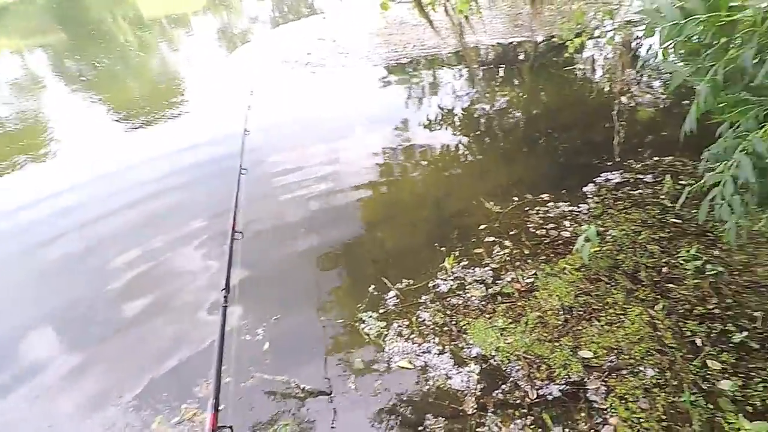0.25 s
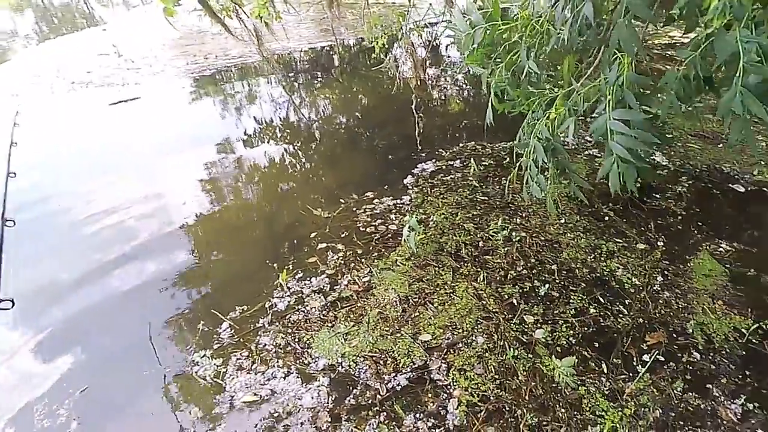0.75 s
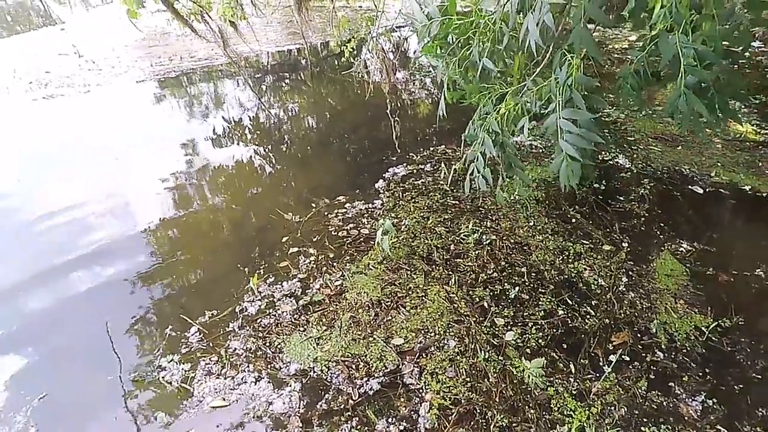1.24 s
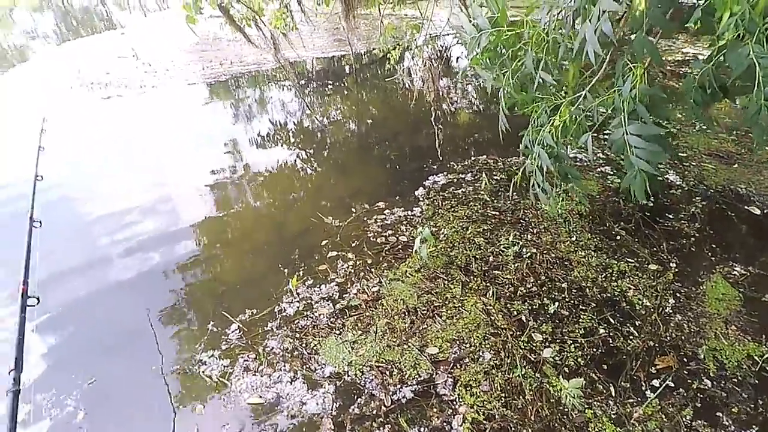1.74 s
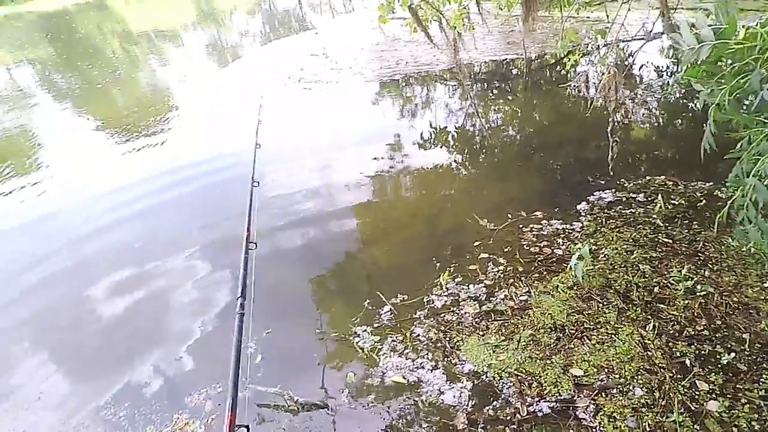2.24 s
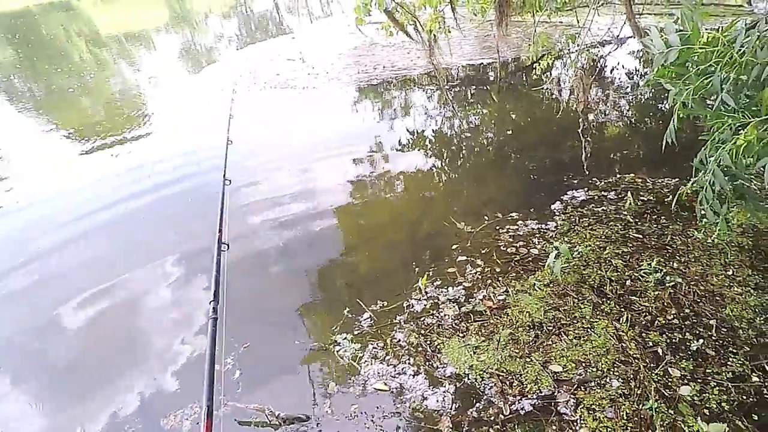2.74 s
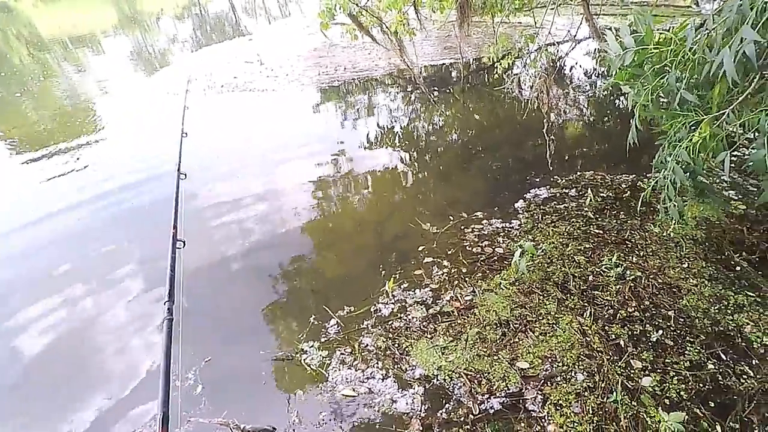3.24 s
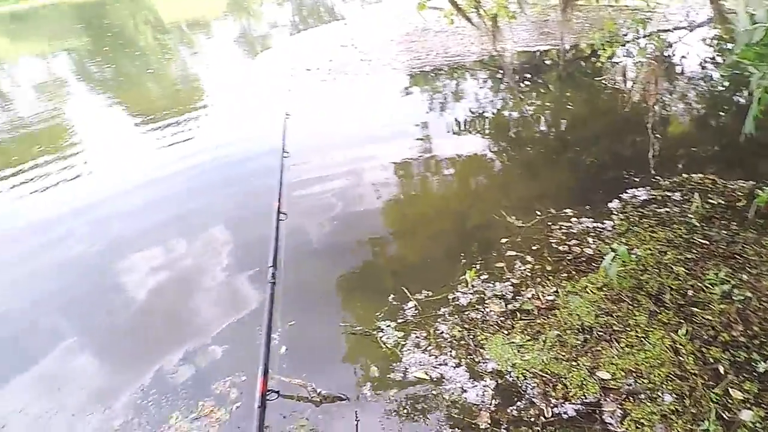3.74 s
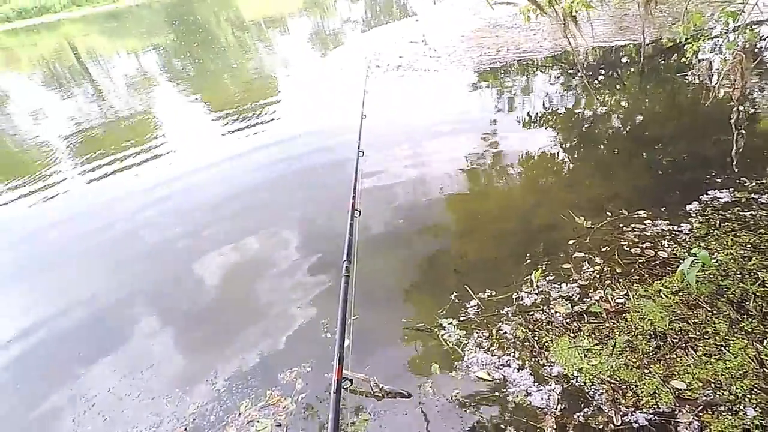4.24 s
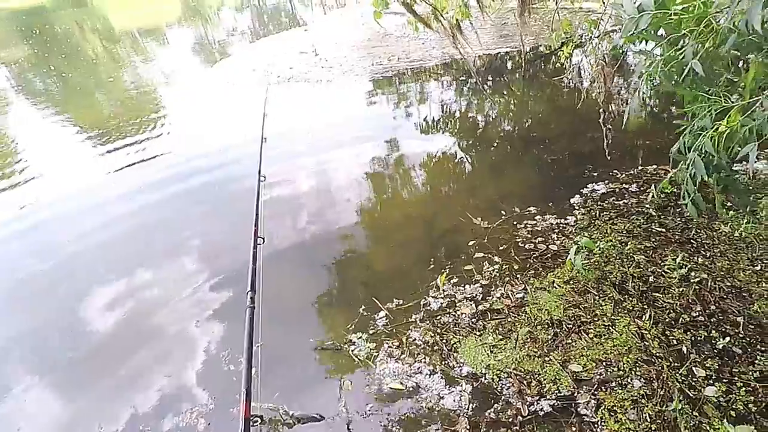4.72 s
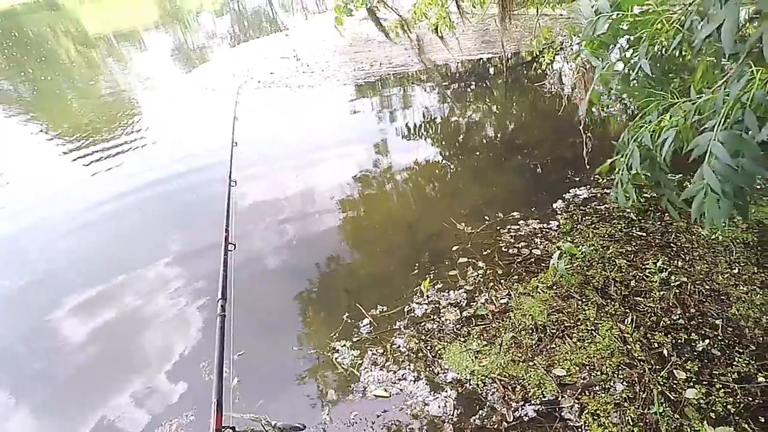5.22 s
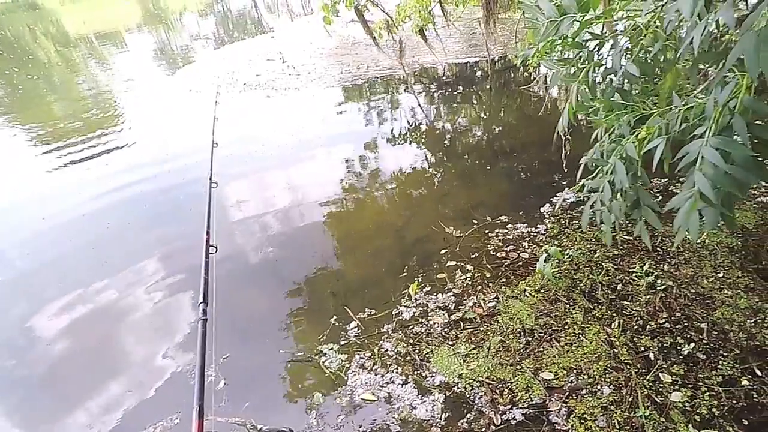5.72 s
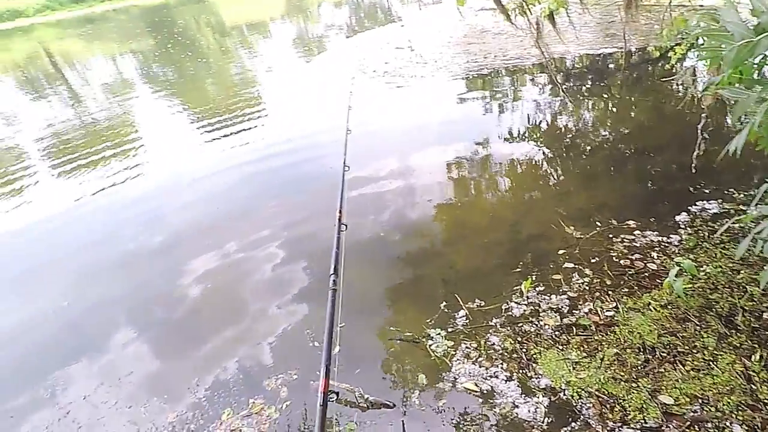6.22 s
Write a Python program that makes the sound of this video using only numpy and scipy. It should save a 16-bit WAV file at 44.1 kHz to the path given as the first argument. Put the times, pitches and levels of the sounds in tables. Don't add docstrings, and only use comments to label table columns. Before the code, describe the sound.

Three loud hollow plops at a pond's edge, water spattering between them, before gusts fade and a blackbird whistles among distant birds.

```python
import sys
import numpy as np
from scipy import signal
from scipy.fft import rfft, irfft
from scipy.io import wavfile
from scipy.ndimage import uniform_filter1d

SR = 44100
rng = np.random.default_rng(int(sys.argv[2]) if len(sys.argv) > 2 else 0)


def digitize_waveform(pressure):
    field = np.atleast_2d(pressure).T
    bounded = np.clip(field, -1, 1)
    quanta = np.round(bounded * 32767).astype(np.int16)
    wavfile.write(sys.argv[1], SR, quanta)


def gain_from_decibels(decibels):
    exponent = np.asarray(decibels, float) / 20
    return 10 ** exponent


N = 285318
T = np.arange(N) / SR


def unit(x):
    return x / np.sqrt(np.mean(x ** 2))


def coloured(points):
    hz, db = np.transpose(points)
    f = np.maximum(np.fft.rfftfreq(N, 1 / SR), 1)
    gain = gain_from_decibels(np.interp(np.log(f), np.log(hz), db))
    return unit(irfft(rfft(rng.standard_normal(N)) * gain, N))


def band(lo_hz, hi_hz):
    sos = signal.butter(3, [lo_hz, hi_hz], "bandpass", fs=SR, output="sos")
    return unit(signal.sosfilt(sos, rng.standard_normal(N)))


def flicker(rate_hz):
    hold = int(SR / rate_hz)
    return uniform_filter1d(np.repeat(rng.standard_normal(N // hold + 1), hold), hold)[:N]


def add(out, start_s, x):
    i = int(start_s * SR)
    out[i:i + len(x)] += x[:N - i]


def phase(hz):
    return 2 * np.pi * np.cumsum(hz) / SR


def edges(t, length_s, edge_s):
    return np.clip(np.minimum(t, length_s - t) / edge_s, 0, 1)


def ping(hz, t60, glide, rise):
    t = np.arange(int(t60 * SR)) / SR
    tone = np.sin(2 * np.pi * hz * (t + glide * t ** 2 / t60))
    return tone * gain_from_decibels(-60 * t / t60) * np.minimum(t / rise, 1)


# opening_s, deepest_hz, glide_per_s, last_db, fade_db_per_s, skew_rad
CAVITIES = [
    (.1729, 105.1, -27.3, -2.9, 655, .4),
    (.8791, 87.8, -66.8, -1.3, 1040, -1.03),
    (1.5937, 73, -14.6, -1.1, 567, .51),
]
# pinch_s, first_hz, last_hz, climb_s
BUBBLES = [
    (.1908, 51.9, 405.5, .0107),
    (.8965, 160.4, 522.9, .0458),
    (1.6169, 150.4, 401.7, .0155),
]
# peak_db, early_drop_db, t60_s, life_s
RINGS = [
    (4.1, 14.6, .23, .0373),
    (3.7, .4, .14, .0481),
    (7.4, 8.2, .108, .0435),
]
# late_rush_share, rush_s, settling_s
NECKS = [
    (.26, .0005, .0135),
    (.56, .0008, .0084),
    (.63, .0035, .0117),
]
# share, lag_s
BANK = [
    (.178, .0068),
    (.126, .0071),
    (.083, .0068),
]


def plops(opening_s=.004, closing_s=.0014, burst_s=.006):
    out = np.zeros(N)
    for cavity, bubble, ring, neck, bank in zip(CAVITIES, BUBBLES, RINGS, NECKS, BANK):
        opens, deep_hz, glide, last_db, fade, skew = cavity
        pinch, first_hz, top_hz, climb = bubble
        peak_db, drop_db, t60, life = ring
        rush, rush_s, settle_s = neck
        share, lag = bank
        back = np.arange(int((pinch - opens) * SR), 0, -1) / SR
        turn = 2 * np.pi * deep_hz * (back + glide * back ** 2 / 2)
        swell = np.minimum((back[0] - back) / opening_s, 1)
        throb = (1 - rush) * gain_from_decibels(fade * back) * np.cos(turn + skew * np.sin(turn))
        throb += rush * np.exp(-back / rush_s)
        t = T[:int(life * SR)]
        hz = top_hz - (top_hz - first_hz) * np.exp(-t / climb)
        db = last_db + (peak_db - last_db) * np.minimum(t / closing_s, 1)
        db = db - drop_db * (1 - np.exp(-(t / settle_s) ** 2)) - 60 * t / t60
        rings = gain_from_decibels(db) * np.minimum((life - t) / burst_s, 1) * np.cos(phase(hz))
        plop = np.concatenate([gain_from_decibels(last_db) * swell * throb, rings])
        add(out, pinch - back[0], plop)
        add(out, pinch - back[0] + lag, share * plop)
    return gain_from_decibels(2.1) * out


# pitch_hz, level_db (per Hz)
SLAP = [(240, -4.5), (400, -3.5), (867, -9.5), (2650, -12), (3840, -13.5), (6860, -15), (8570, -19.5),
        (10100, -37), (14000, -40)]
# start_s, end_s, first_db, last_db
TEARS = [
    (0.1674, 0.1745, -19, -15),
    (0.174, .178, -22, -27),
    (.18, 0.183, -27, -24),
    (0.184, 0.193, -23, -24),
    (0.873, 0.878, -39, -30),
    (0.881, 0.8883, -25.5, -11.5),
    (0.889, 0.903, -23, -26),
    (1.584, 1.596, -29, -18.5),
    (1.595, 1.601, -14.5, -31),
    (1.599, 1.623, -29, -28),
]
# pitch_hz, level_db, t60_s
WOOD = [(625, 8, 0.015), (1290, -0.5, 0.052), (2600, 1, 0.016), (3470, -5, 0.013), (4540, -13.5, 0.06),
        (7400, -20, 0.01432)]
# start_s, knock_db, lowest_mode_db, ring_share, upper_pitch_share
KNOCKS = [
    (0.1706, -14.5, 0, .3, 1.001),
    (0.8841, -12.5, -6, 0.46, .82),
    (1.5932, -8, -7, 0.78, 1.001),
]


def slaps(edge_s=0.00017):
    out, hiss = np.zeros(N), coloured(SLAP) * gain_from_decibels(2.5 * flicker(900))
    for start, end, first_db, last_db in TEARS:
        t = T[:int((end - start) * SR)]
        level = edges(t, t[-1], edge_s) * gain_from_decibels(np.linspace(first_db, last_db, len(t)))
        add(out, start, level * hiss[int(start * SR):][:len(t)])
    for start, knock_db, low_db, ring, upper in KNOCKS:
        for hz, db, t60 in WOOD:
            if hz < 1000:
                db += low_db
            elif hz < 2000:
                t60 *= ring
            else:
                hz *= upper
            add(out, start, gain_from_decibels(knock_db + db) * ping(hz, t60, glide=0, rise=0.00071))
    return out


# start_s, peak_db, pitch_hz
TICKS = [(0.0388, -29, 5180), (0.126, -28, 6670), (.2836, -27, 5710), (.355, -30, 3300), (.362, -29, 7400),
         (0.4135, -28, 7000), (.43, -29, 7200), (0.4604, -25, 5610), (0.4845, -23, 4800),
         (0.6085, -20, 6457), (.6683, -31, 4750), (0.7505, -16, 6700), (.8334, -28, 6130),
         (0.847, -22, 5500), (.962, -26, 4300), (1.036, -27, 5600), (1.0893, -31, 5550),
         (1.1146, -26, 3950), (1.121, -25, 3750), (1.166, -30, 7800), (1.172, -26, 4343),
         (1.206, -28, 6020), (1.2245, -26, 4500), (1.255, -30, 6500), (1.3135, -20, 5800),
         (1.329, -26, 8000), (1.435, -31, 7500), (1.475, -18, 5940), (1.478, -21, 3050),
         (1.5639, -25, 3660), (1.74, -29, 4000), (1.782, -26, 4489), (1.822, -30, 6900), (1.831, -27, 3900),
         (1.897, -31, 4100), (1.9928, -32, 4760), (2.1939, -26, 6640)]
# start_s, peak_db, pitch_hz,
# t60_s
DRIPS = [(.138, -33, 2600, .015), (0.219, -25, 1200, 0.03), (.244, -24, 1302, .015),
         (0.353, -32, 1070, 0.047), (.37, -36, 755, .06), (.384, -26, 1730, 0.02593),
         (.4, -42, 1012, 0.0459), (.484, -36, 948.6, .03), (.548, -34, 2470, 0.033), (.308, -31, 1370, .03),
         (.358, -35, 1500, .03), (.394, -33, 2700, .015), (0.873, -9, 85, .03), (.944, -24, 417, .04),
         (.952, -19, 430, 0.048), (0.951, -33, 1130, 0.03), (.985, -33, 1190, 0.059),
         (1.026, -24, 950, .015), (1.043, -29, 870, 0.037), (1.091, -24, 750, 0.023),
         (1.092, -27, 1530, 0.042), (1.123, -31, 2550, .015), (1.14, -31, 1155, 0.044),
         (1.16, -29, 1820, 0.044), (1.475, -21, 2210, 0.014), (1.57, -40, 1340, .1), (1.579, -35, 1340, .1),
         (1.5865, -9.5, 330, .012), (1.59, -24, 1200, .02), (1.659, -24, 440, .04), (1.662, -28, 1030, .03),
         (1.662, -30, 1710, .02), (1.74, -25, 347, .04), (1.765, -35, 1050, .04), (1.79, -35, 1600, .02),
         (1.801, -32, 1600, .02), (1.813, -33, 1600, .02), (1.883, -34, 1850, 0.033),
         (1.91, -30, 1750, .02), (1.96, -38, 840, .025), (1.981, -32, 2000, .012), (1.783, -28.5, 490, 0.1),
         (1.825, -32, 2600, .015), (1.847, -23, 1440, 0.025), (1.851, -29, 756, 0.066),
         (1.902, -32, 2090, 0.018), (1.906, -30, 2900, 0.013), (1.917, -31, 1400, 0.0216),
         (2.037, -32, 2600, 0.01366)]


def runoff():
    fizz = band(3900, 7160) + gain_from_decibels(-21 + 3.0 * flicker(45)) * band(11800, 13200)
    out = sheets(column=1) * gain_from_decibels(2.2 * flicker(90) + 2.2 * flicker(450) - 0.6) * fizz
    out += sheets(column=2) * gain_from_decibels(-0.54) * gurgle()
    crackle = band(2200, 8400)
    for start, db, hz in TICKS:
        add(out, start, gain_from_decibels(db - 3) * ping(hz, t60=0.0049, glide=0.13, rise=0.00019))
        colour = ping(hz, t60=.0012, glide=0, rise=.0001)
        burst = np.convolve(crackle[int(start * SR):][:700], colour) / 3
        add(out, start, gain_from_decibels(db - 11.0) * burst * np.exp(-T[:len(burst)] / 0.004))
    for start, db, hz, t60 in DRIPS:
        add(out, start, gain_from_decibels(db) * ping(hz, t60, glide=0.07, rise=0.00075))
    return out


# crest_s, fine_spray_db, gurgle_db, fade_db_per_s
SHEETS = [(.005, -49, -64, 280), (.135, -42.5, -52, 63), (.2, -40, -31.5, 222), (.26, -51, -47.5, 60),
          (.35, -60, -44, 50), (.42, -47, -59, 60), (.46, -55, -45.5, 110), (.488, -47, -47, 250),
          (.555, -51, -53, 150), (.752, -40.5, -70, 598), (.845, -42, -52, 44), (.91, -49.5, -38, 45),
          (1.1, -56, -46, 62), (.99, -58, -60, 200), (1.2, -54, -63, 90), (1.228, -48, -70, 250),
          (1.313, -47, -74, 160), (1.481, -37.5, -55, 483), (1.57, -46, -54, 56),
          (1.635, -42.5, -34.5, 130), (1.725, -54, -58, 60), (1.78, -59, -47, 27), (1.89, -57, -56, 40),
          (1.844, -54, -51, 44), (2.06, -61, -72, 103), (2.197, -45, -60, 120), (2.26, -53, -66, 170)]


def sheets(column, dry_s=2.9, swell_db_s=800):
    t = T[T < dry_s]
    wet = np.zeros(len(t))
    for row in SHEETS:
        crest, fade = row[0], row[3]
        wet += gain_from_decibels(row[column] - np.where(t < crest, swell_db_s * (crest - t), fade * (t - crest)))
    return np.pad(wet, (0, N - len(t)))


def gurgle(count=4000, length_s=2.6):
    out = np.zeros(N)
    for when, pitch, size in rng.random((count, 3)):
        hz = 650 * 4.0 ** pitch ** 1.15
        bubble = ping(hz, t60=22 / hz, glide=0.25, rise=0.00012)
        add(out, length_s * when, gain_from_decibels(-22 * size ** 0.57) * bubble)
    return out / np.std(out[:int(length_s * SR)])


# time_s, level_db
WIND = [(0, -30), (.13, -25), (.29, -28.5), (.49, -19), (.57, -27.5), (.84, -25.5), (.96, -34),
        (1.2, -27.5), (1.74, -34), (2.0, -24), (2.45, -22), (2.7, -25), (2.9, -30), (3.9, -39.5),
        (4.55, -43.5), (5.05, -55), (5.9, -60), (6.47, -68)]
# start_s, peak_db, pitch_hz
BUFFETS = [(.13, -16, 70), (.44, -17, 65), (.475, -14, 75), (1.01, -26, 115), (1.215, -18, 62),
           (2.005, -18, 60), (2.221, -21, 122), (2.26, -20, 70), (2.453, -17, 121.2), (2.57, -16, 80),
           (2.69, -18, 85), (2.942, -30, 176), (3.579, -23.5, 155), (3.657, -21, 159), (3.769, -18, 168),
           (3.983, -26, 160), (4.067, -17.5, 152), (4.345, -21.5, 132), (4.427, -13.5, 150.5),
           (4.575, -25.5, 159), (5.093, -28.5, 191), (5.614, -28, 161), (6.254, -28, 166)]


def wind():
    gust_db = np.interp(T, *np.transpose(WIND))
    rumble = coloured([(8, -0.5), (25, 10.0), (60, 5.5), (90, -1.0), (125, -9.0), (200, -23),
                       (500, -40), (3000, -90)])
    out = gain_from_decibels(gust_db + 1.3 * flicker(8.2) + 2.0 * flicker(21.95) + 1.83) * rumble
    flutter = coloured([(105, -48), (132, -2.0), (165, -0.5), (230, -9.0), (500, -26.0), (3000, -88)])
    flutter_db = -36 + 0.27 * (gust_db + 31)
    out += gain_from_decibels(flutter_db + 4.0 * flicker(12) + 2.34 * flicker(25) - 4.0) * flutter
    for start, db, hz in BUFFETS:
        add(out, start, gain_from_decibels(db + 2.0) * ping(hz, t60=0.11, glide=0.015, rise=0.0085))
    return out


def birds():
    out = (phrases() + whistles()) * gain_from_decibels(1.5 * flicker(70))
    out += trill() + far_calls()
    tail = T[:SR // 2]
    echo = rng.standard_normal(len(tail)) * gain_from_decibels(-60 * tail / 1.25) * (tail > .01)
    return out + gain_from_decibels(-43.5) * (.85 + .5 * flicker(70)) * signal.fftconvolve(out, echo)[:N]


# time_s, pitch_hz, level_db
LOW_PHRASES = [
    [(0.36, 1600, -47), (0.376, 1745, -54), (0.384, 1702, -46), (0.44, 1660, -49)],
    [(0.528, 2040, -52), (0.54, 2145, -42), (0.612, 2231, -46), (0.636, 2567, -45), (0.66, 2593, -42),
     (0.704, 2552, -51), (0.714, 2588, -46), (0.754, 2560, -49), (0.765, 2540, -60)],
    [(1.03, 1877, -56), (1.09, 1803, -46), (1.126, 1825, -47), (1.14, 2038, -45), (1.156, 2465, -47),
     (1.172, 2546, -47), (1.22, 2570, -46), (1.245, 2560, -53), (1.3, 2575, -62)],
    [(2.135, 1237, -54), (2.157, 1385, -58), (2.173, 1349, -56), (2.189, 1410, -56), (2.217, 1739, -49),
     (2.271, 1860, -42), (2.28, 1822, -53)],
    [(2.288, 1850, -54), (2.296, 1834, -46), (2.306, 1970, -44), (2.318, 1976, -44), (2.328, 1812, -51),
     (2.336, 1606, -54), (2.354, 1923, -43), (2.372, 1885, -45), (2.385, 1820, -57)],
    [(3.475, 1740, -60), (3.483, 1733, -52), (3.531, 2004, -54), (3.539, 1916, -53), (3.569, 2096, -55),
     (3.675, 2183, -55), (3.752, 2170, -61)],
    [(3.755, 2299, -59), (3.777, 1984, -50), (3.807, 1944, -51), (3.835, 2035, -50), (3.849, 2001, -49),
     (3.887, 1628, -53), (3.911, 1640, -52), (3.943, 1809, -53), (3.99, 1818, -56)],
    [(4.76, 2150, -56), (4.858, 2266, -48), (4.878, 2223, -53), (4.934, 2257, -53), (4.958, 2266, -59),
     (5.02, 2250, -59)],
    [(6.12, 1537, -59), (6.134, 1596, -53), (6.146, 1666, -56), (6.202, 1719, -54), (6.25, 1710, -60)],
]
# time_s, pitch_hz, level_db
HIGH_PHRASES = [
    [(2.01, 3439, -64), (2.028, 3370, -48), (2.05, 3101, -45), (2.068, 3084, -50), (2.075, 3253, -65)],
    [(2.18, 3583, -63), (2.188, 3538, -48), (2.206, 3313, -53), (2.222, 3300, -55), (2.232, 3300, -47),
     (2.268, 3540, -50), (2.314, 3593, -50), (2.37, 3598, -58)],
    [(2.398, 2780, -59), (2.406, 2848, -51), (2.434, 2780, -46), (2.45, 2650, -50), (2.53, 2675, -51),
     (2.547, 2716, -61)],
    [(2.72, 2135, -63), (2.728, 2390, -46), (2.738, 2504, -44), (2.778, 2480, -41), (2.788, 2338, -41),
     (2.796, 1950, -46)],
    [(2.958, 3434, -64), (2.968, 3363, -54), (2.984, 3240, -47.5), (3.04, 3252, -63)],
    [(3.075, 3534, -61), (3.091, 3520, -52), (3.109, 3360, -51), (3.115, 3499, -60), (3.125, 3468, -48),
     (3.145, 2876, -45.5), (3.181, 2353, -56), (3.193, 2330, -53), (3.2, 2331, -60)],
    [(4.09, 2480, -62), (4.1, 2486, -52), (4.14, 2350, -57), (4.151, 2320, -51), (4.22, 2200, -50),
     (4.331, 2070, -52), (4.365, 2040, -44.5), (4.425, 2040, -54)],
    [(4.88, 2899, -62), (4.914, 2824, -52), (5.002, 2870, -54), (5.016, 2850, -47), (5.026, 2865, -56),
     (5.162, 2794, -51.5), (5.18, 2790, -59)],
]


def phrases(edge_s=0.0055):
    out, quaver = np.zeros(N), 1 + .008 * flicker(160)
    for marks in LOW_PHRASES + HIGH_PHRASES:
        s, hz, db = np.transpose(marks)
        length = s[-1] - s[0]
        t = T[:int(length * SR)]
        pitch_hz = np.interp(s[0] + t, s, hz) * quaver[int(s[0] * SR):][:len(t)]
        level = edges(t, length, edge_s) * gain_from_decibels(np.interp(s[0] + t, s, db) + 3.5)
        add(out, s[0], level * np.sin(phase(pitch_hz)))
    return out


# start_s, length_s, first_hz, held_hz, level_db
SLURS = [
    (2.849, 0.06, 3750, 3830, -52.5),
]
# start_s, length_s, first_hz, last_hz, level_db
GLIDES = [
    (0, 0.091, 2095, 1956, -47.5),
    (.432, .013, 1700, 2050, -40),
    (.443, .013, 2000, 3200, -44),
    (1.51, .075, 3660, 3620, -57),
    (1.885, .025, 3400, 3330, -54),
    (1.901, .01, 1900, 4200, -48),
    (1.91, .022, 3150, 2780, -53),
    (2.535, 0.028, 1470, 1720, -52),
    (2.559, .085, 1720, 1646, -49),
    (5.385, .1, 2480, 2400, -59),
]


def whistles(slur_share=.2, rise_s=0.0078, fade_db_s=26):
    out = np.zeros(N)
    slur = lambda u: 1 - np.exp(-u / slur_share)
    even = lambda u: u
    for notes, path in ((SLURS, slur), (GLIDES, even)):
        for start, length, first_hz, other_hz, db in notes:
            t = T[:int(length * SR)]
            edge = edges(t, length, min(rise_s, length / 4))
            hz = first_hz + (other_hz - first_hz) * path(t / length)
            add(out, start, edge * gain_from_decibels(db + 5.5 - fade_db_s * t) * np.sin(phase(hz)))
    return out


# time_s, centre_hz, swing_hz, level_db
TRILL = [
    (6.295, 2060, 0, -48),
    (6.325, 1980, 65, -39),
    (6.361, 1970, 285, -43),
    (6.41, 2065, 370, -38),
    (6.455, 2015, 380, -46),
]


def trill(warble_hz=51.5, crest_s=6.337):
    s, hz, swing_hz, db = np.transpose(TRILL)
    bend = np.interp(T, s, swing_hz) * np.cos(2 * np.pi * warble_hz * (T - crest_s))
    level = gain_from_decibels(np.interp(T, s, db, -120, -120) + 0.018 * bend)
    return level * np.sin(phase(np.interp(T, s, hz) + bend))


# start_s, length_s, first_hz, last_hz, level_db
THIN_CALLS = [(2.734, .016, 5300, 4950, -50), (2.748, 0.028, 4950, 4420, -42),
              (2.607, 0.059, 4020, 3250, -51), (2.879, 0.15, 3870, 4090, -56.5),
              (2.94, .17, 5520, 5760, -59), (3.651, .18, 6300, 6430, -60.5),
              (4.142, 0.23, 4840, 4710, -54.5), (5.37, .07, 6300, 6700, -56.5),
              (5.777, .06, 6400, 6940, -59), (5.827, .14, 6950, 7070, -59), (5.98, .035, 5250, 4968, -59),
              (6.007, 0.13, 4960, 4930, -51), (6.12, 0.12, 6600, 6650, -60), (6.15, .1, 4930, 4900, -61)]
# start_s, length_s, first_hz, last_hz, level_db
CHATTER = [(2.055, .06, 5400, 4600, -54), (2.298, 0.071, 4430, 4500, -52), (2.64, .069, 3780, 3680, -53),
           (2.755, .04, 4750, 4500, -50), (2.78, .08, 4690, 4640, -56), (2.85, .1, 4800, 4700, -58),
           (2.86, .19, 3850, 4050, -57), (3.82, .073, 4160, 4590, -52.5), (3.92, 0.079, 4440, 4610, -50.5),
           (4.15, .27, 2350, 2060, -56), (4.487, .1, 5400, 4500, -55), (4.5, .19, 4700, 5300, -56),
           (4.55, .13, 5800, 5900, -57), (5.097, .153, 7400, 7000, -55.5), (5.245, .1, 4380, 4100, -51),
           (5.25, .1, 7000, 7300, -59), (5.3, .55, 4220, 4310, -55), (5.78, .2, 6450, 6600, -60),
           (6.12, .12, 5950, 5900, -59), (6.249, 0.27, 6230, 6280, -55), (6.3, .16, 5600, 5500, -58)]


def far_calls():
    out = np.zeros(N)
    for calls, spread, clear in ((THIN_CALLS, 0.031, 0.69), (CHATTER, 0.11, 0)):
        for start, length, first_hz, last_hz, db in calls:
            t = T[:int(length * SR)]
            lowpass = signal.butter(2, spread * last_hz / 2, fs=SR, output="sos")
            smear = signal.sosfilt(lowpass, rng.standard_normal((2, len(t))))
            turn = phase(np.linspace(first_hz, last_hz, len(t)))
            call = (smear[0] + clear * np.std(smear)) * np.sin(turn) + smear[1] * np.cos(turn)
            level = gain_from_decibels(db + np.linspace(2.5, -2.5, len(t))) * np.hanning(len(t)) ** 0.081
            add(out, start, level * unit(call))
    return out


# pitch_hz, level_db (per Hz)
PARK = [(79, -47), (135, -2.5), (197, -1.5), (255, -4), (386, -7.5), (789, -16), (2090, -22), (3360, -31.5),
        (4620, -26.5), (7430, -32), (9060, -26.5), (13800, -42), (15500, -48)]


def park():
    hush = gain_from_decibels(-42 + 2.5 + .5 * flicker(6.23)) * coloured(PARK)
    return signal.sosfilt(signal.butter(8, 122, "highpass", fs=SR, output="sos"), hush)


def scene():
    return (plops() + slaps() + runoff() + wind() + birds() + park())[None]


def low_pass(x):
    return signal.sosfilt(signal.butter(12, 15640, fs=SR, output="sos"), x)


def record(dry, duck_db=4.0, wait_s=.045, attack_s=0.03, release_s=0.45):
    after = np.maximum(T - wait_s, 0)
    memory = np.exp(-after / release_s) - np.exp(-after / attack_s)
    overload = 1. * (np.abs(dry[0]) > .9)
    duck = signal.fftconvolve(overload, memory)[:N]
    mix = np.clip(dry * gain_from_decibels(-duck_db * np.tanh(duck / 260)), -1, 1)
    return low_pass(mix)


dry = scene()
out = record(dry)
digitize_waveform(out)
```